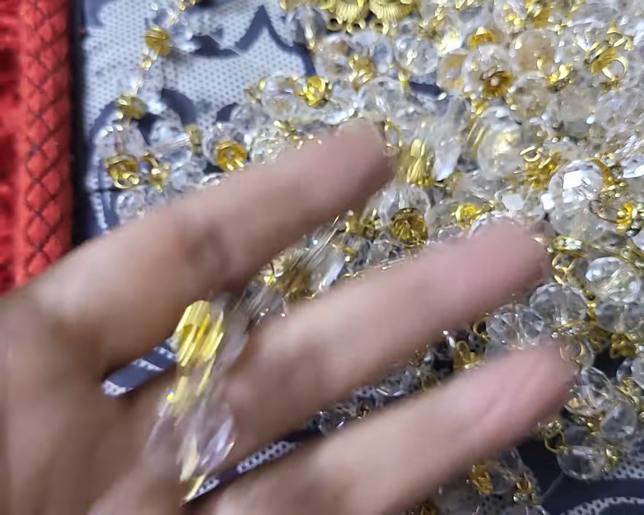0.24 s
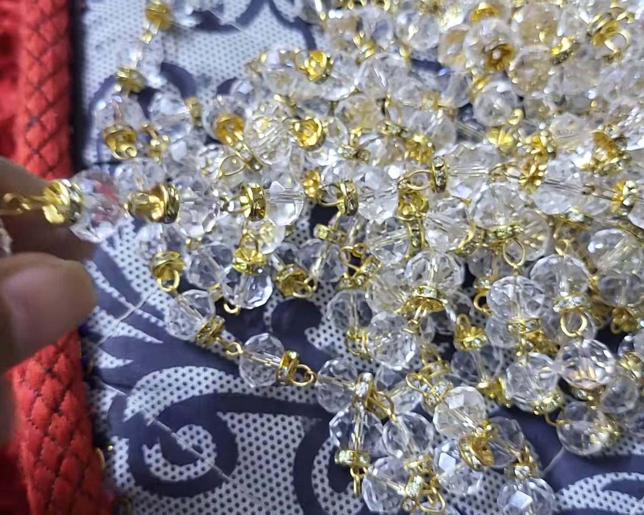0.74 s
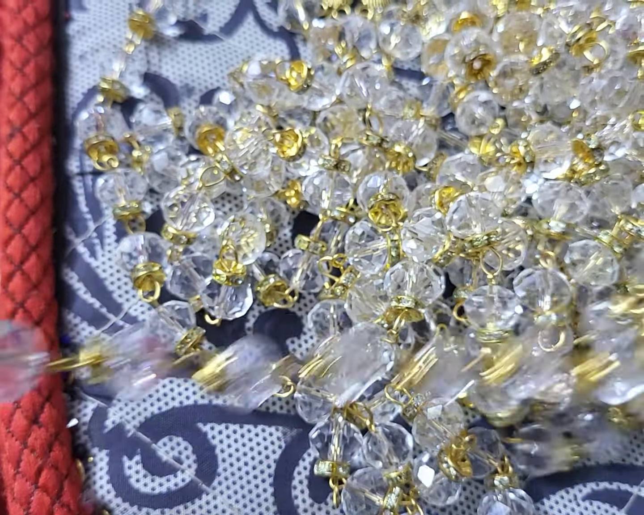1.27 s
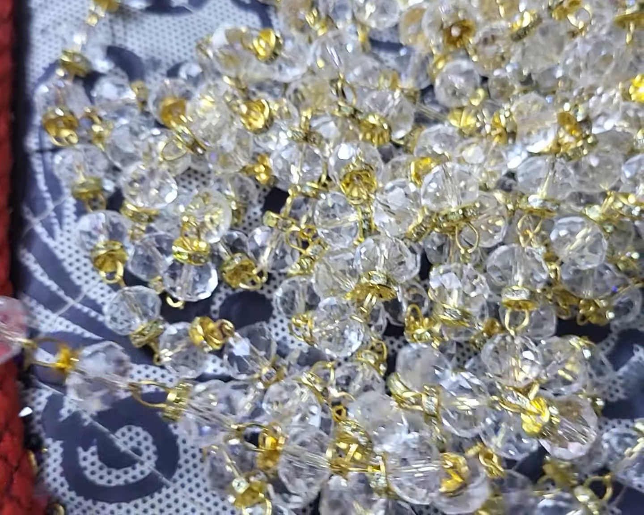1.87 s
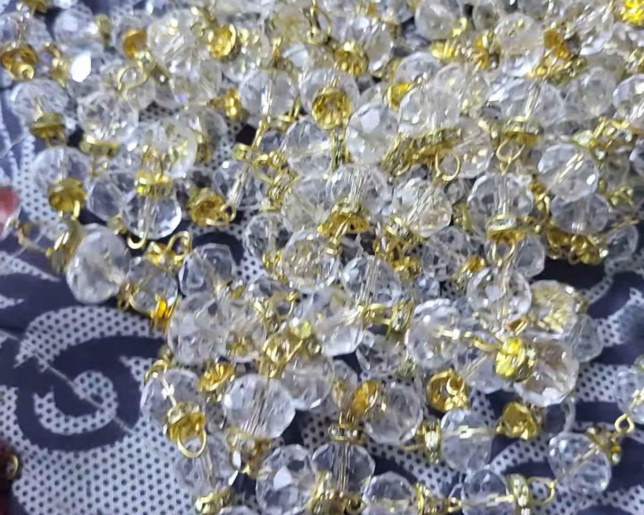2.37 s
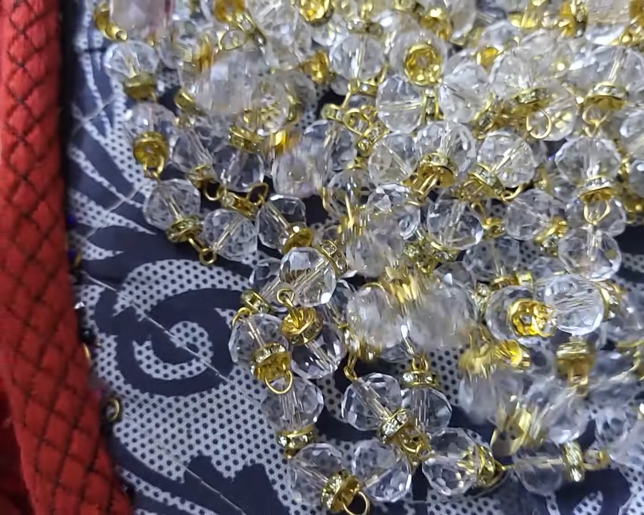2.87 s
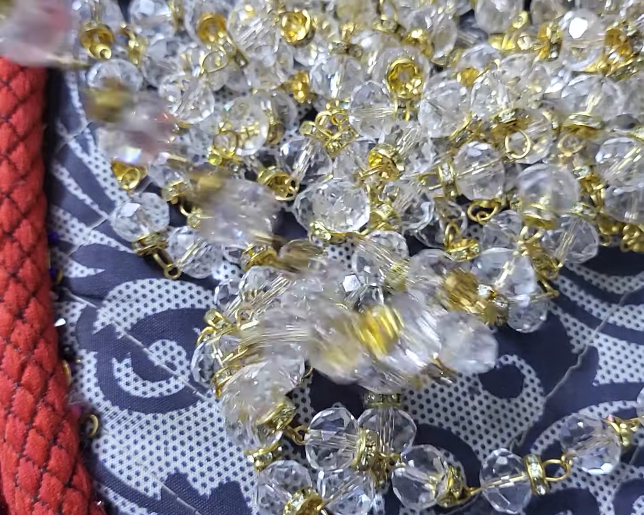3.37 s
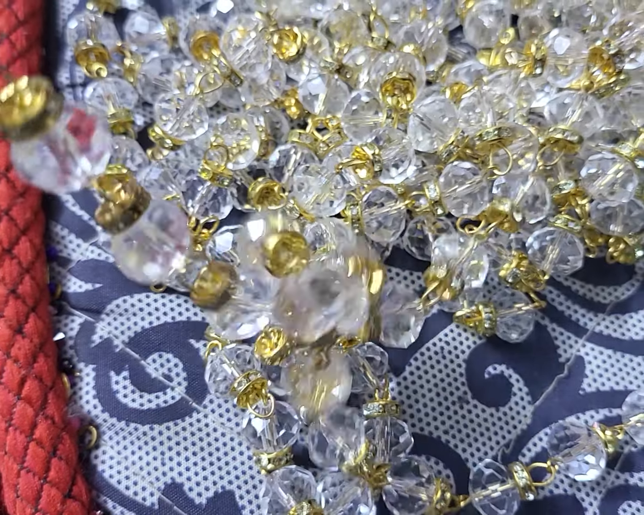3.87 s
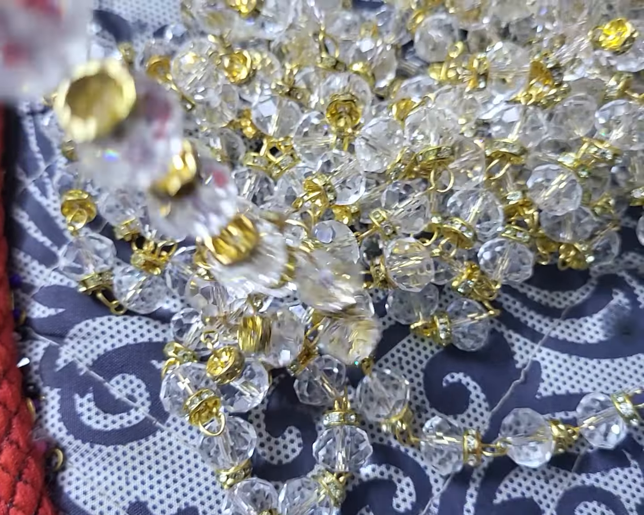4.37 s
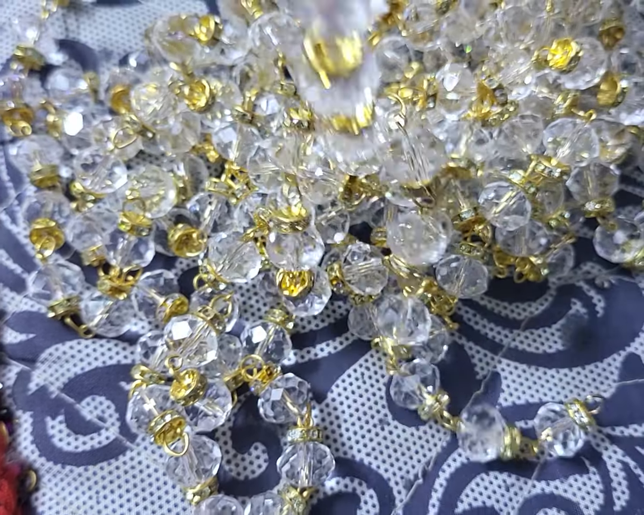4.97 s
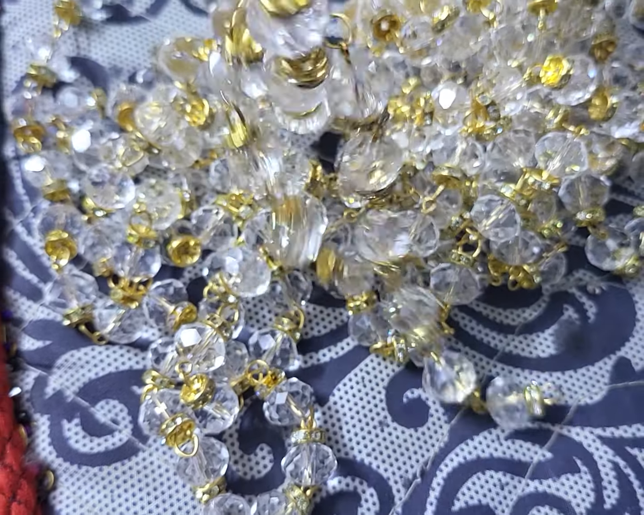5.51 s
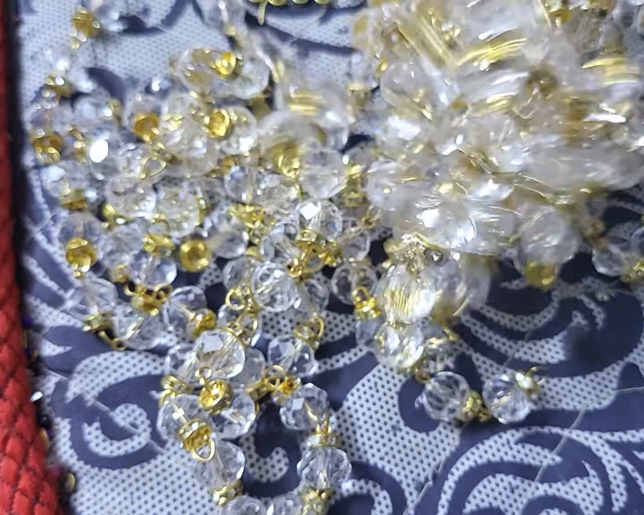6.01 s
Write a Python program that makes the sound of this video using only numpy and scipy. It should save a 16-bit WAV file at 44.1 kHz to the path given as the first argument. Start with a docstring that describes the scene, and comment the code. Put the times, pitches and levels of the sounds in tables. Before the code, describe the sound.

Close to a stereo microphone, strands of glass beads on fine chain are handled over a heap on cloth. Faint rattling starts it, then dry ticks come in short bursts with small gaps, soft swishes and dull little landings. The last second grows busy and loudest, ending in a clattering drop. A low fan hum and rumble run throughout in a small, dry room.

```python
"""A fan hums and rumbles across the room; close by, faint rattling gives way to dry ticks of glass on glass.
Strands of faceted glass beads on a fine chain are dragged and lifted over a heap lying on cloth.
Each knock is a burst of random touches about a millisecond long; shaped noise makes the swish and the thumps.
The fan is coloured noise plus a wavering sine. Two small microphone ports, each with its own treble
resonances, hear the beads from close by."""
import sys
import numpy as np
from scipy import signal
from scipy.fft import rfft, irfft
from scipy.io import wavfile

SR = 44100
rng = np.random.default_rng(int(sys.argv[2]) if len(sys.argv) > 2 else 0)


def store_pcm(level_fs):
    """Save levels as 16-bit WAV."""
    pcm = np.round(np.clip(level_fs, -1, 1) * 32767).astype(np.int16)
    wavfile.write(sys.argv[1], SR, np.atleast_2d(pcm).T)


N = 275625   # samples, 6.25 s
HZ = np.maximum(np.fft.rfftfreq(4096, 1 / SR), 1)   # frequency axis of the port responses

# The clearest knocks of glass on glass. Each row: time in seconds, relative level in dB,
# drive of the treble above the split in dB re the range below, left-right difference in dB.
CLEAR_KNOCKS = [(0.2795, -48.5, -8, -4), (0.353, -46, -10, 0), (0.3893, -35, -1, 0), (0.42, -37, -7, 1),
                (0.4536, -44, -11, -3), (0.4691, -37.5, 12, -1), (0.5133, -49, -1, 13),
                (0.557, -40, -8, -2), (0.6625, -52, -3, 5), (0.7065, -44, 12, 10), (1.1302, -36, -8, 3),
                (1.1366, -34.5, -20, -3), (1.1596, -44, -20, -4), (1.321, -47, -8, -9),
                (1.372, -39, -8, -5), (1.3845, -26, -6, -5), (1.3918, -27, -6, 4), (1.408, -28.5, -7, -3),
                (1.4219, -32.5, -2, -4), (1.466, -39, 4, 2), (1.4726, -24, 17, 0), (1.477, -28, 5, -6),
                (1.4839, -27, -8, -1), (1.5084, -32, 10, -5), (1.5426, -30, -7, 0), (1.5898, -41, 4, -1),
                (1.6033, -40, 1, -1), (1.6299, -40, -3, 6), (1.7227, -43, -4, -1), (1.7373, -41, -5, 6),
                (1.7485, -36.5, 1, -1), (1.7696, -47, -6, 0), (1.8081, -48, -13.5, 9), (1.9635, -52, -6, 0),
                (1.9786, -47.5, -15, 9), (2.0663, -44, -6, -4), (2.076, -41, -14, -5), (2.106, -42, -5, 6),
                (2.1235, -34, 5, 3), (2.1404, -31, 2, 12.5), (2.1967, -45.5, -17, -4),
                (2.2237, -52, -4, -10), (2.4538, -51, 4, 13), (2.6789, -37, 2, 1), (2.688, -28, 1, -1),
                (2.6985, -30, 8, 11), (2.7463, -28, 6, 15), (2.7503, -25, -7, -6), (2.7568, -26, 13, 4),
                (2.7714, -28, 7, -3), (2.7874, -33, 1, 1), (2.794, -27, 6, 4), (2.806, -28.5, -7.5, -2),
                (2.8285, -31.5, -9, -2), (2.848, -43, 2, 1), (2.9901, -41, 7, 9), (3.005, -39, -3, 3),
                (3.0196, -35, -2.5, 0), (3.0488, -26, 3, -10), (3.0528, -29, 4, 9), (3.066, -27, 14, 1),
                (3.0704, -30, 1, -3), (3.0824, -31, 8, 2), (3.0971, -27.5, 2, 4), (3.1136, -34, -5, -2.5),
                (3.1484, -24.5, 4, 3), (3.1668, -24.5, 7, 3), (3.1854, -32, 4, -2), (3.1918, -32, 3, 2),
                (3.2095, -36, 11, -1), (3.3727, -44.5, -11, 2), (3.4152, -32, 19, 8),
                (3.425, -31.5, -0.5, 6), (3.4707, -37, -11, 0), (3.496, -39, 3, 5), (3.584, -42, 1, 11),
                (3.5981, -24.5, -4.5, -3), (3.7451, -39.5, -6, 10), (3.984, -43.5, 7, 11),
                (4.011, -30, 2, 4.5), (4.0652, -37, -4, -4), (4.112, -36, 2, -1), (4.1244, -26.5, 9, 10),
                (4.1323, -30.5, 0, -7), (4.1677, -27.5, 13, 2), (4.181, -28.5, -1, 4), (4.2039, -36, -1, 6),
                (4.2367, -36, 5, 9), (4.474, -46.5, -3, 3), (4.5747, -34.5, 5, 5), (4.6233, -38.5, -2.5, 3),
                (4.633, -21, 9, 4), (4.637, -25, 22, 8), (4.6703, -28, -4, 9.5), (4.6813, -33, 8, 3),
                (4.727, -41.5, -6, 1), (4.7572, -41.5, 5, 9), (4.8206, -34, 16.5, -1),
                (4.9704, -35.5, 11, 4.5), (4.9901, -30, 4, -4), (5.0054, -23, 4, 1), (5.008, -26.5, 4, 7),
                (5.0349, -38, -5, 5.5), (5.0646, -38, -6, -1), (5.1751, -37, -10, 10),
                (5.2258, -32.5, 4, 4), (5.234, -20, 2.5, -0.5), (5.2426, -31, 2, 1), (5.2999, -27.5, 2, 8),
                (5.3094, -38, -3, -3), (5.3244, -36, -8, 4), (5.4013, -39, -17, -8), (5.422, -29, -17, -3),
                (5.442, -29, -11, 1), (5.5538, -31, -8, 6), (5.5677, -43, 4, -4), (5.5818, -29, 2, -12),
                (5.5872, -25.5, 1, 5), (5.645, -31, 2, 0), (5.6479, -29, 6, 11), (5.6676, -35, 17, 6),
                (5.6904, -18.5, 9, -3), (5.695, -23, 6, 1), (5.725, -18.5, 2, -0.5), (5.7306, -29.5, 7, -7),
                (5.7432, -23, 10, -2), (5.7539, -23.5, 7, 7), (5.778, -22, -1, 1), (5.7953, -29, 6, 1),
                (5.8418, -35, 10, 5), (5.8721, -30, 4, 6), (5.8867, -33.5, 3, 3), (5.9133, -31, 3, -3),
                (5.9283, -25, 9, 5), (5.9816, -35, 7, 2), (6.0085, -35, 8, -5), (6.0214, -21, 3, 1),
                (6.0683, -17.5, 3, 3), (6.085, -23.5, 1.5, -9), (6.0996, -16, 5, 0), (6.1271, -20, -3, 7),
                (6.1421, -17, 1, -3), (6.1568, -17.5, 2, 6), (6.1772, -21, -1, 5), (6.194, -25.5, -8, -7),
                (6.2085, -21.5, -5, 3), (6.2222, -20, -6.5, -9), (6.2374, -17, 14, 2),
                (6.2481, -16, 10, -8)]
# Colour of a tick at the microphone ports. Each row: frequency in Hz, relative level in dB.
TICK_COLOUR = [(1470, -45.5), (2500, -19.5), (3490, -7.5), (3900, -10.5), (4390, -7.5), (4990, -8),
               (7190, -1), (7600, 0.5), (8300, -11), (8770, -12.5), (14500, -3.5), (15900, 1.5),
               (16700, -31.5)]
# How the two ports differ. Each row: frequency in Hz, left-right difference in dB.
PORT_DIFFERENCE = [(60, -3), (150, -13), (380, 2), (950, 7), (2380, -2.5), (5980, -0.5), (15000, 1.5)]
# Heavier landings on the cloth. Each row: time in seconds, relative level in dB,
# drive of the low body in dB re that level, pitch in Hz.
LANDINGS = [(0.4515, -46.5, -21, 1350), (1.3708, -47, -6, 1767), (1.474, -48.5, -1.5, 1440),
            (1.5767, -46.5, -7, 1570), (2.0749, -51.5, -16, 2240), (2.749, -40.5, -7.5, 1650),
            (3.052, -41.5, -7.5, 1773), (3.0891, -51.5, -4.5, 1970), (3.1467, -49, -3.5, 1700),
            (4.1492, -56, -3, 1200), (4.629, -48, -5.5, 1060), (5.4388, -50, -22, 1920),
            (5.7188, -62, 0, 1795), (6.1412, -43.5, -4, 1773), (6.199, -38.5, -4, 1432)]
# Tugs on the strand. Each row: start in seconds, length in seconds, drive of the fine rattle in dB,
# drive of the strand brushing the cloth in dB.
STRAND_TUGS = [(0.04, 0.2, -78.5, -73.5), (0.234, 0.094, -73, -70.5), (0.365, 0.19, -56, -63),
               (0.661, 0.034, -66, -84), (1.087, 0.097, -64, -74), (1.2, 0.13, -73, -69.5),
               (1.372, 0.065, -49.5, -59), (1.46, 0.19, -51.5, -55.5), (1.717, 0.079, -61, -65),
               (1.801, 0.12, -72, -65), (1.959, 0.033, -67.5, -71), (2.052, 0.1, -60, -63.5),
               (2.17, 0.047, -68, -72), (2.417, 0.032, -69.5, -73), (2.678, 0.032, -51.5, -61.5),
               (2.747, 0.076, -52.5, -59.5), (2.992, 0.036, -58, -62), (3.044, 0.063, -49, -59.5),
               (3.148, 0.039, -47.5, -56.5), (3.356, 0.083, -62.5, -68.5), (3.467, 0.065, -63, -69.5),
               (3.584, 0.033, -58.5, -69), (3.723, 0.054, -62, -72), (3.84, 0.03, -73, -76),
               (3.978, 0.087, -57.5, -67.5), (4.117, 0.14, -49, -62.5), (4.313, 0.027, -65, -73),
               (4.468, 0.02, -68.5, -74), (4.53, 0.013, -70, -59.5), (4.619, 0.1, -54, -67.5),
               (4.817, 0.02, -65.5, -72.5), (4.863, 0.082, -70, -71.5), (4.962, 0.078, -57.5, -67),
               (5.078, 0.068, -69.5, -68.5), (5.174, 0.18, -52.5, -63), (5.388, 0.072, -50, -56),
               (5.535, 0.07, -53, -63.5), (5.641, 0.16, -43, -58.5), (5.866, 0.11, -48, -63),
               (6.014, 0.086, -42, -57.5), (6.128, 0.068, -34, -55), (6.193, 0.08, -30.5, -47.5)]
# The heap drops on the table. One row: time in seconds, frequency in Hz, level in dB before the decay.
HEAP_DROP = (6.242, 150, -24)
# The motor hum wavers. Each row: time in seconds, level in dB rms.
HUM_LEVEL = [(0.0, -43), (0.05, -49), (1.27, -43.5), (1.71, -52), (2.37, -48.5), (2.58, -42), (3.12, -51.5),
             (4.05, -44), (4.79, -49), (5.59, -46), (6.25, -48.5)]
# Colour of the fan rumble. Each row: frequency in Hz, relative level in dB.
RUMBLE_COLOUR = [(33, -32), (56, -4.5), (76, -10.5), (199, -4), (265, -17), (300, -19.5), (485, -23.5),
                 (581, -28.5), (631, -29.5), (1310, -31), (1500, -37), (1950, -92), (3300, -120)]
# Duct resonances of the fan. Each row: centre in Hz, width in Hz, level in dB rms.
DUCT_RESONANCES = [(124.5, 10.4, -52.5), (200.1, 14.8, -55), (412.3, 25, -67)]
# Colour of the air hiss. Each row: frequency in Hz, relative level in dB.
HISS_COLOUR = [(880, -20), (1500, -2), (1830, -5.5), (2120, -3.5), (2510, -46), (3120, -10), (4730, -62),
               (7390, -9.5), (8400, -52), (16000, -47)]
# Likeness of rumble and hiss at the two ports. Each row: frequency in Hz, left-right correlation.
PORT_LIKENESS = [(60, 0.99), (180, 0.98), (550, 0.45), (1650, -0.35), (4970, -0.17), (15000, -0.18)]

SPLIT_HZ = 9000   # between the two treble ranges of a knock
SPRAY_S = 0.00082   # decay time of the touches in one contact
LEFT_LEAD_S, LEAD_SPREAD_S = 0.0001, 0.00008   # the left port hears a contact first, on average
# beads jostled by each clear knock: count, mean level re the knock, mean lag, spread of the lag
NEIGHBOURS, NEIGHBOUR_DB, NEIGHBOUR_LAG_S, NEIGHBOUR_SCATTER_S = 2, -8, 0.0005, 0.0037
# lesser knocks: greatest rate, level re the rattle drive, spread of the level
LESSER_PER_S, LESSER_DB, LESSER_UNEVEN_DB = 90, 5.5, 6
LESSER_TOP_SPREAD_DB, LESSER_PAN_SPREAD_DB = 11, 6.5
STILL_DB, BUSY_DB = -78.5, -62   # rattle drives between which lesser knocks set in
ATTACK_DB_PER_S, SAG_DB_PER_S, RELEASE_DB_PER_S = 600, 30, 350.5   # a tug swells, sags, dies away
SETTLE_DB, SETTLE_DB_PER_S = -14, 70.5   # then the heap settles: level re the tug, fall
BRUSH_SETTLE_DB = -10   # the brushing falls less than the rattle when a tug ends
REST_RATTLE_DB, REST_BRUSH_DB = -85, -76.5   # drives while the strand sways between tugs
ROOM_T60_S, ROOM_DB = 0.1, -12
RUMBLE_DB, HISS_DB, HUM_HZ = -43.5, -69.5, 47.6   # mean level of each noise ahead of any filter


def from_db(db):
    """Decibels to gain."""
    return 10 ** (np.asarray(db) / 20)


def rms_one(x):
    """Scale to rms 1."""
    return x / np.sqrt(np.mean(x ** 2) + 1e-20)


def in_time(rows):
    """Table columns as curves, one value a sample."""
    s, *columns = np.transpose(rows)
    return [np.interp(np.arange(N) / SR, s, column) for column in columns]


def at_hz(points, hz):
    """Read a spectrum on a log-frequency axis."""
    point_hz, value = np.transpose(points)
    return np.interp(np.log(hz), np.log(np.maximum(point_hz, 1)), value)


def band(x, low_hz, high_hz):
    """Butterworth band-pass."""
    return signal.sosfilt(signal.butter(2, [low_hz, high_hz], "band", fs=SR, output="sos"), x)


def causal(db):
    """Minimum-phase impulse response shaped like this magnitude, peak 1."""
    cepstrum = irfft(np.log(from_db(db)))
    cepstrum[1:2048] *= 2
    cepstrum[2049:] = 0
    pulse = irfft(np.exp(rfft(cepstrum)))[:512]
    return pulse / np.max(np.abs(pulse))


def drift(rate):
    """Slow random wander below about this rate in Hz, spread 1, drawn every 40 samples."""
    r = np.exp(-80 * np.pi * rate / SR)
    noise = rng.standard_normal(N // 40 + 2002)
    slow = signal.lfilter([1], [1, -2 * r, r * r], noise)[2000:]
    return np.interp(np.arange(N) / 40, np.arange(len(slow)), rms_one(slow))


def contacts(at_s, gain, pan_db, chatter_db, chatter_s):
    """A sharp touch inside a brief spray from facets and neighbours, different towards each port; energy 1."""
    length, touch = 300, 30   # samples: whole spray, place of the sharp touch
    draw = rng.standard_normal((len(at_s), 2, length))
    lead = (LEFT_LEAD_S + LEAD_SPREAD_S * draw[:, 0, 0]) * SR
    t = (np.arange(length) - touch) / SR
    envelope = np.where(t < 0, np.exp(t / 0.00061), np.exp(-t / chatter_s))
    shape = from_db(chatter_db) * draw * envelope
    shape[:, :, touch] = np.sign(draw[:, :1, 1])   # the touch has one sign at both ports
    shape /= np.sqrt(np.sum(shape ** 2, axis=2, keepdims=True))
    out = np.zeros((2, N + 400))
    for side, sign in enumerate((1, -1)):
        start = np.clip(np.round(at_s * SR - touch - sign * lead / 2).astype(int), 0, N)
        port_gain = gain * from_db(sign * pan_db / 2)
        np.add.at(out[side], start[:, None] + np.arange(length), port_gain[:, None] * shape[:, side])
    return out[:, :N]


def at_ports(x):
    """Each port colours the tick with its own resonances."""
    ports = []
    for side, sign in enumerate((1, -1)):
        colour_db = at_hz(TICK_COLOUR, HZ) + sign * at_hz(PORT_DIFFERENCE, HZ) / 2
        ports.append(signal.oaconvolve(x[side], causal(colour_db))[:N])
    return np.array(ports)


def knocks(rows):
    """A glancing or a square contact shifts the balance between the two treble ranges."""
    s, db, top_db, pan_db = np.transpose(rows)
    middle_db = db - 10 * np.log10(1 + from_db(2 * top_db)) + 8.0   # the two drives share the energy
    state = rng.bit_generator.state
    middle = contacts(s, from_db(middle_db), pan_db, chatter_db=-5.0, chatter_s=SPRAY_S)
    rng.bit_generator.state = state   # one and the same contact feeds both ranges
    top = contacts(s, from_db(middle_db + top_db), pan_db, chatter_db=-6.5, chatter_s=SPRAY_S)
    middle = band(at_ports(middle), 1300, SPLIT_HZ)
    top = band(at_ports(top), SPLIT_HZ, 15200)
    return middle - top   # opposite sign: no notch at the split


def neighbours():
    """Each clear knock comes amid others, mostly weaker, from the beads strung next to it."""
    rows = np.repeat(CLEAR_KNOCKS, NEIGHBOURS, axis=0)
    shift = [NEIGHBOUR_LAG_S, NEIGHBOUR_DB, 0, 0]
    spread = [NEIGHBOUR_SCATTER_S, 3.0, 4.0, 4.0]   # s, dB, dB, dB
    return rows + shift + spread * rng.standard_normal(rows.shape)


def lesser_knocks(rattle_db):
    """Knock rows at random moments, more and stronger the livelier the handling."""
    busy = np.clip((rattle_db - STILL_DB) / (BUSY_DB - STILL_DB), 0, 1)
    at = np.flatnonzero(rng.random(N) < LESSER_PER_S * busy / SR)
    draw = rng.standard_normal((len(at), 3))
    db = rattle_db[at] + LESSER_DB + LESSER_UNEVEN_DB * np.clip(draw[:, 0], -3, 1.5)
    top_db = LESSER_TOP_SPREAD_DB * draw[:, 1]
    pan_db = LESSER_PAN_SPREAD_DB * draw[:, 2]
    return np.transpose([at / SR, db, top_db, pan_db])


def handling():
    """Drives in dB of rattle and brushing: the powers of all tugs add to the sway at rest."""
    t = np.arange(0, N, 32) / SR
    power = from_db(2 * np.array([[REST_RATTLE_DB], [REST_BRUSH_DB]]))
    settle_db = np.array([[SETTLE_DB], [BRUSH_SETTLE_DB]])
    for s, length, *db in STRAND_TUGS:
        after = np.maximum(t - s - length, 0)
        held_db = -ATTACK_DB_PER_S * np.maximum(s - t, 0) - SAG_DB_PER_S * np.clip(t - s, 0, length)
        release = from_db(-2 * RELEASE_DB_PER_S * after)
        settling = from_db(2 * (settle_db - SETTLE_DB_PER_S * after))
        power = power + from_db(2 * (np.array(db)[:, None] + held_db)) * (release + settling)
    return [np.interp(np.arange(N) / SR, t, 10 * np.log10(p)) for p in power]


def rattle(level_db):
    """Links and distant beads tick in clumps; a livelier hand makes the ticks more uneven."""
    busy = np.clip((level_db + 79.5) / 20, 0, 1)
    ticks_per_s = 1500 * from_db(3.0 * busy * drift(40))
    born = np.flatnonzero(rng.random(N) < ticks_per_s / SR)
    uneven_db = np.clip(2.76 * busy[born], 0, 4)
    size = from_db(uneven_db * np.minimum(rng.exponential(1, len(born)), 4))
    size = size * np.sqrt(1 - uneven_db * np.log(10) / 10)   # offsets the power that unevenness adds
    pan_db = rng.normal(0, 2.9, len(born))
    ticks = contacts(born / SR, size, pan_db, chatter_db=7.0, chatter_s=SPRAY_S)
    return from_db(level_db - 4.0) * rms_one(at_ports(ticks))


def thumps():
    """A bunch of beads lands within some milliseconds: a dull burst near its pitch and a low body."""
    t = np.arange(3000) / SR
    out = np.zeros((2, N + len(t)))
    for s, db, body_db, hz in LANDINGS:
        burst = rng.standard_normal((2, len(t))) * (1 - np.exp(-t / 0.00065)) * np.exp(-t / 0.016)
        dull = from_db(9.5) * band(burst, hz / 1.31, hz * 1.4)
        body = from_db(body_db + 20.5) * band(burst[0], 365, 665)   # alike at both ports
        start = round(s * SR)
        out[:, start:start + len(t)] += from_db(db) * (dull + body)
    return out[:, :N]


def brushing(level_db):
    """The strand slides over the weave: a dull grainy swish."""
    grains = rng.standard_normal((2, N)) * from_db(2.3 * drift(66))
    return from_db(level_db + 3.0) * rms_one(band(grains, 890, 3820))


def bump():
    """A low, soft swing of the table top: a decaying sine."""
    s, hz, db = HEAP_DROP
    t = np.maximum(np.arange(N) / SR - s, 0)
    return from_db(db) * np.sin(2 * np.pi * hz * t) * np.exp(-t / 0.03)


def room(x):
    """Diffuse tail: dying noise, unrelated at the two ports."""
    t = np.arange(int(0.3 * SR)) / SR
    tail = rng.standard_normal((2, len(t))) * from_db(-60 * t / ROOM_T60_S) * (1 - np.exp(-t / 0.00055))
    tail = signal.lfilter([1], [1, -0.3], tail)   # slightly duller
    tail = tail / np.sqrt(np.sum(tail ** 2, 1, keepdims=True))
    return signal.oaconvolve(x, tail, axes=1)[:, :N]


def air(spectrum):
    """Stereo noise of this colour, most alike at the ports in the bass; rms 1."""
    hz = np.maximum(np.fft.rfftfreq(N, 1 / SR), 1)
    mid, side = rfft(rng.standard_normal((2, N))) * from_db(at_hz(spectrum, hz))
    alike = np.clip(at_hz(PORT_LIKENESS, hz), -0.99, 0.999)
    return rms_one(irfft(np.sqrt(1 + alike) * mid + np.sqrt(1 - alike) * side * [[1], [-1]], N))


def fan():
    """Noise for rumble and hiss, narrow bands of noise for the duct, a sine for the motor hum."""
    rumble = from_db(RUMBLE_DB + 1.3 * drift(1.5)) * band(air(RUMBLE_COLOUR), 57, 5000)
    rumble = rumble * from_db([[0.4], [-0.4]])   # slightly louder on the left
    hiss = from_db(HISS_DB + 0.59 * drift(12.0)) * air(HISS_COLOUR)
    duct = np.zeros(N)
    for hz, width, db in DUCT_RESONANCES:
        duct += from_db(db) * rms_one(band(rng.standard_normal(N), hz - width / 2, hz + width / 2))
    hum_gain = np.sqrt(2) * from_db(in_time(HUM_LEVEL)[0])   # rms to peak
    hum = hum_gain * np.sin(2 * np.pi * HUM_HZ * np.arange(N) / SR)
    return rumble + hiss + duct + hum


def scene():
    """Beads close by with a short room tail, cloth and table under them, fan far off."""
    rattle_db, brush_db = handling()
    all_knocks = np.vstack([CLEAR_KNOCKS, neighbours(), lesser_knocks(rattle_db)])
    beads = knocks(all_knocks) + rattle(rattle_db) + thumps()
    return beads + from_db(ROOM_DB) * room(beads) + brushing(brush_db) + bump() + fan()


def roll_off(x):
    """The treble ends steeply here."""
    return signal.sosfilt(signal.butter(12, 16840, fs=SR, output="sos"), x)


def record(dry):
    """The top is cut steeply near 16 kHz."""
    steep_cut = signal.cheby2(10, 20, 16100, fs=SR, output="sos")
    mix = signal.sosfilt(steep_cut, dry)
    return roll_off(mix)


dry = scene()
out = record(dry)
store_pcm(out)
```